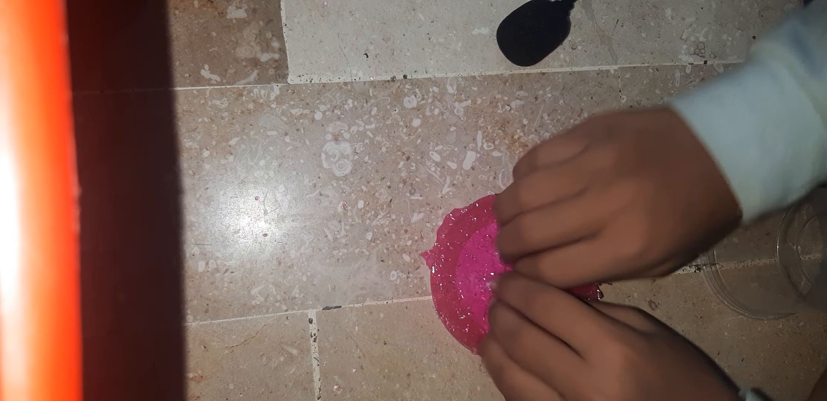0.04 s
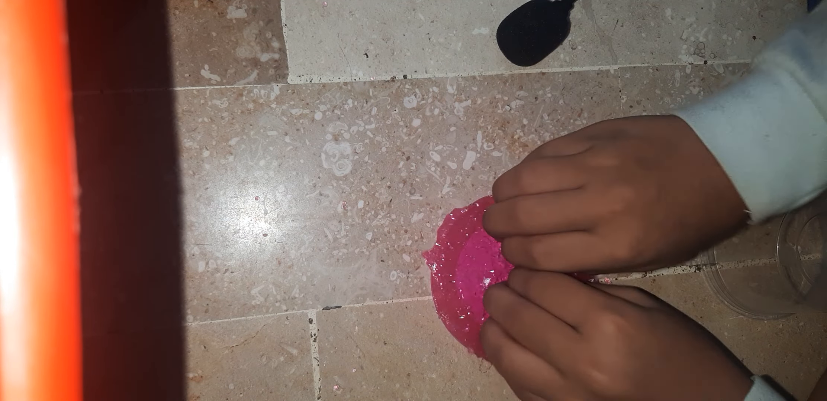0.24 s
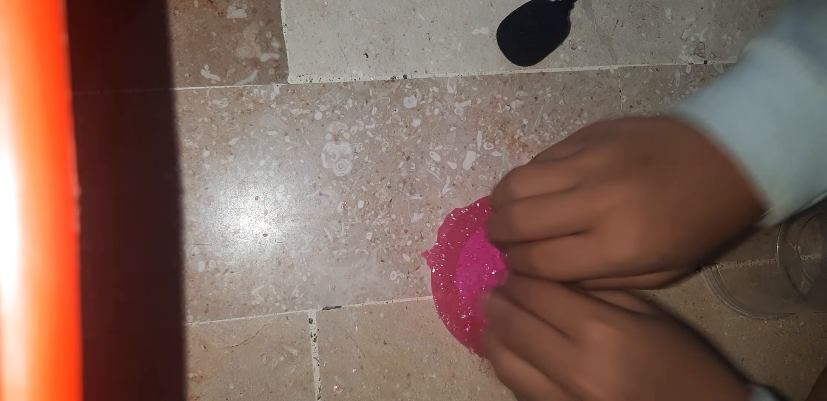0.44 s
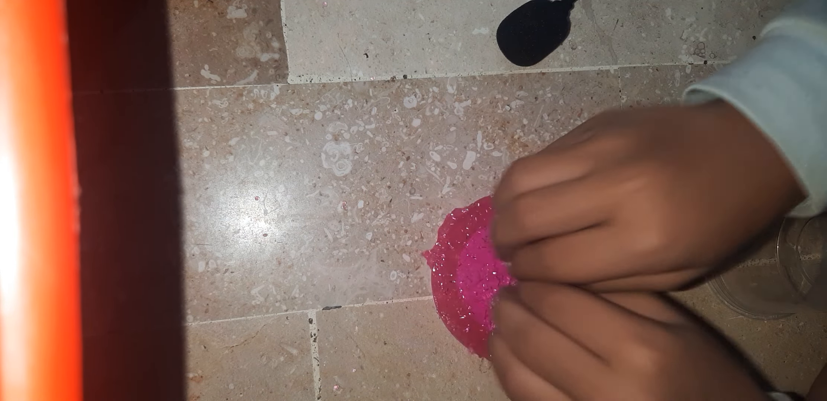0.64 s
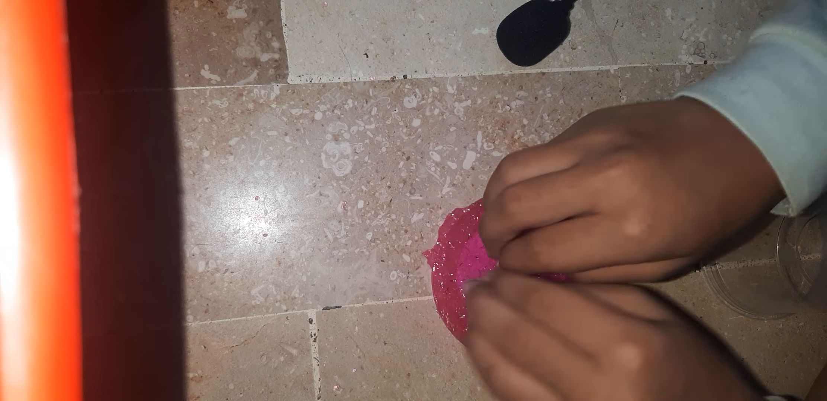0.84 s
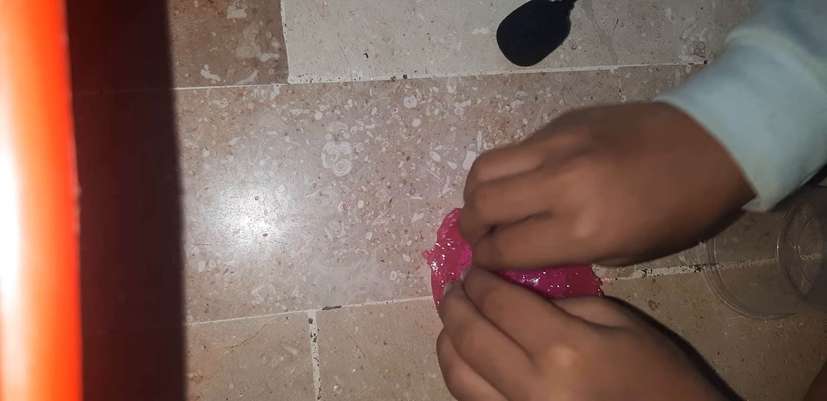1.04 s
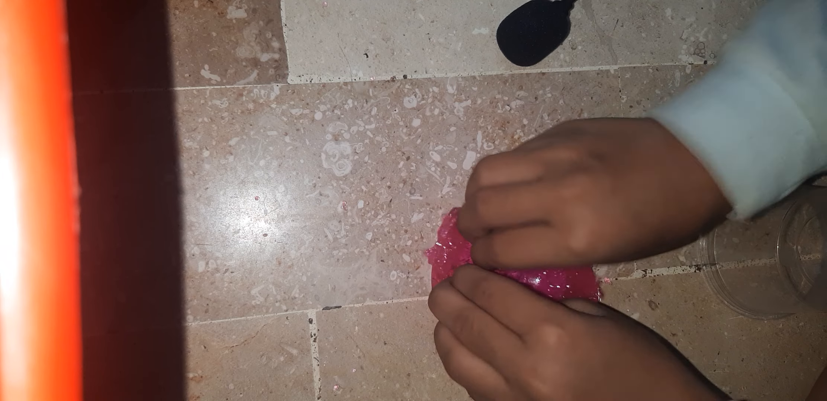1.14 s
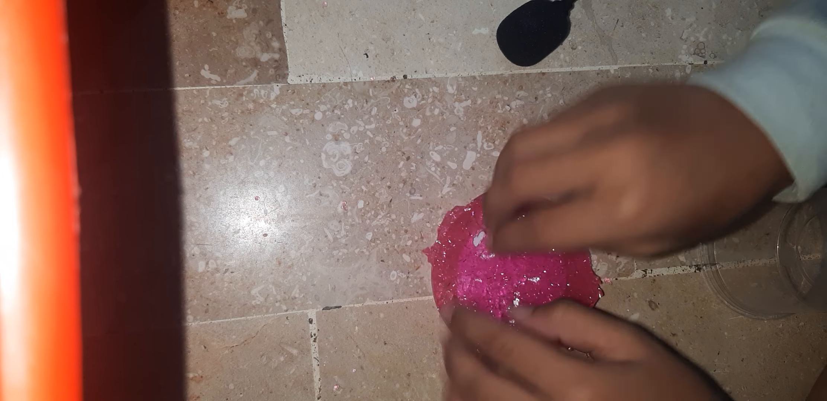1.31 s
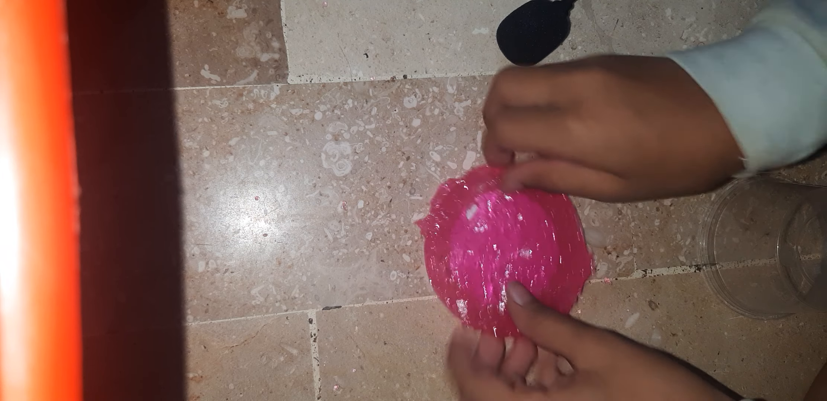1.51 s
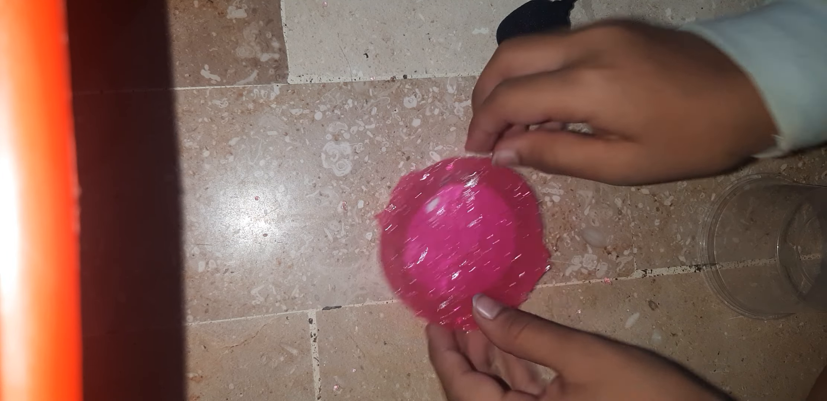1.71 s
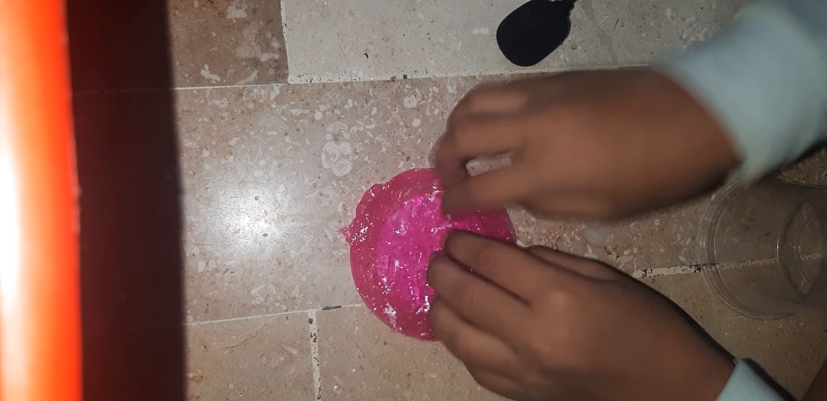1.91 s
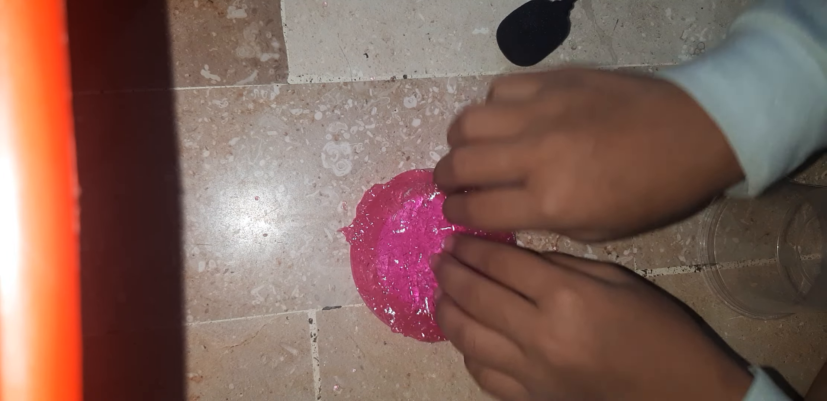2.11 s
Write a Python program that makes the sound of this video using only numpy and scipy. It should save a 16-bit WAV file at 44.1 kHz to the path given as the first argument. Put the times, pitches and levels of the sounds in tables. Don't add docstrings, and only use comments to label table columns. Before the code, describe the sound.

Slime handled very close to the microphone in a hard, tiled room: hollow pops and wet peeling crackles first, then sharp film snaps as it is pulled, with quieter clicks between, over soft room noise and hum.

```python
import sys
import numpy as np
from scipy import signal
from scipy.fft import rfft, irfft
from scipy.io import wavfile

SR = 44100
rng = np.random.default_rng(int(sys.argv[2]) if len(sys.argv) > 2 else 0)


def file_out(sig):
    cols = np.atleast_2d(sig).T
    lim = np.clip(cols, -1, 1)
    pcm = np.round(lim * 32767).astype(np.int16)
    wavfile.write(sys.argv[1], SR, pcm)


def gain_from_db(level_db):
    decades = np.asarray(level_db, float) / 20
    return 10 ** decades


N = 94815
LEAD_S = 0.1


def rms_one(x):
    return x / np.sqrt(np.mean(x ** 2) + 1e-20)


def at_hz(points, hz, axis=1):
    points = np.array(points)
    return np.interp(np.log(hz), np.log(points[:, 0]), points[:, axis])


def coloured(x, gain_db):
    hz = np.maximum(np.arange(len(x) // 2 + 1) * SR / len(x), 10)
    return irfft(rfft(x) * gain_from_db(gain_db(hz)), len(x))


def high_pass(order, hz):
    return signal.butter(order, hz, "high", fs=SR, output="sos")


BEFORE, AFTER = SR // 200, SR * 3 // 50


def add(track, s, shape):
    at = int((s + LEAD_S) * SR) + np.arange(-BEFORE, AFTER)
    track[at] += shape(at / SR - s - LEAD_S)


def ringing(t, hz, cycles, rise_s, glide=0):
    after = np.maximum(t, 0)
    swell = np.exp(np.minimum(t, 0) / rise_s)
    env = np.where(t < 0, swell, gain_from_db(-60 * after * hz / cycles))
    return env * np.cos(2 * np.pi * hz * t * (1 + glide * hz * after))


# pitch in Hz, level in dB.
FLOOR_COLOUR = [(15, -27), (25, -8), (287, -4), (441, -5), (677, -6), (839, -12), (1100, -12),
                (1730, -17.5), (15200, -31)]
# pitch in Hz, width in Hz, level in dB rms.
APPLIANCES = [(254.2, 3.8, -70), (748, 10, -68), (1108, 24, -77), (2500, 20, -83)]
# time in seconds, level in dB.
NOISE_SWELL = [(0, 12), (.4, 10), (.8, 6.5), (2.15, 1.5)]
# time in seconds, level in dB rms.
HUM_LEVEL = [(.1, -54), (.6, -59.5), (.86, -103), (1.2, -59), (1.4, -67), (1.52, -84), (1.65, -71),
             (2.1, -63)]


def background():
    t = np.arange(N) / SR
    noise = gain_from_db(-60) * rms_one(coloured(rng.standard_normal(N), lambda f: at_hz(FLOOR_COLOUR, f)))
    for hz, width_hz, db in APPLIANCES:
        tone = coloured(rng.standard_normal(N), lambda f: -20 * np.log10(1 + (2 * (f - hz) / width_hz) ** 2))
        noise += gain_from_db(db) * rms_one(tone)
    hum_hz = 57.5
    hum = np.sqrt(2) * gain_from_db(np.interp(t, *np.transpose(HUM_LEVEL))) * np.sin(2 * np.pi * hum_hz * t)
    return noise * gain_from_db(np.interp(t, *np.transpose(NOISE_SWELL))) + hum


def hole_ring(t, hz, upper_db, cycles, third_db):
    rise_s = 0.0006
    lowest = ringing(t, hz, cycles, rise_s, glide=0.011)
    upper = ringing(t, hz * 2.108, cycles * 1.4, rise_s / 2)
    third = ringing(t, hz * 4.1, cycles * 1.4, rise_s / 2)
    return lowest + gain_from_db(upper_db) * upper + gain_from_db(third_db) * third


def holes(size, rows, sign):
    direct, to_room = np.zeros(size), np.zeros(size)
    third_db, slump_lag_s = -15, 0.00764
    for s, db, hz, upper_db, cycles in rows:
        add(direct, s, lambda t: sign * gain_from_db(db) * hole_ring(t, hz, upper_db, cycles, third_db))
        add(direct, s + slump_lag_s, lambda t: gain_from_db(db - 31) * ringing(t, 136, 0.4, slump_lag_s / 5))
        add(to_room, s, lambda t: gain_from_db(db * 1.521) * hole_ring(t, hz, upper_db, cycles * 0.48, third_db - 6))
    return direct, to_room


# time in seconds, peak in dB, hole pitch in Hz,
# level of the upper pitch in dB, cycles of ring.
HOLE_POPS = [(-.05, -23, 620, 16, 4.2), (0.2275, -4.5, 586, -7, 10.5), (.3616, -39, 540, 6, 9),
             (.4850, -4.5, 640, -3, 7), (0.716, -11, 654, 6, 6.6), (0.9226, -31.5, 670, 11, 17),
             (.9270, -15.5, 683, 3, 6.3), (1.0608, -31.5, 703, 2.5, 6.3), (1.1303, -39.5, 690, 12.5, 12),
             (1.14, -28.5, 410, -11, 3.1), (1.1656, -42, 650, 12, 6.9), (1.17, -48, 750, 15.5, 8.1),
             (1.3653, -48.5, 665, 11.5, 9.1), (1.8144, -13, 760, 1, 2.65), (1.9228, -30.5, 700, -11, 14),
             (1.9225, -34, 233, -20, 6.7), (1.9440, -43, 313, 9.5, 1.2), (.373, -38, 604, 1, 10),
             (.083, -42.5, 700, 8.5, 11)]


def pops(size):
    return holes(size, HOLE_POPS, 1)


# pitch in Hz, seconds to fall by 60 dB, colour in dB.
ROOM_DECAY = [(126, 0.097, 18), (338, 0.36, 4.5), (700, 0.55, 3.5), (1540, 0.34, 5.5), (2120, 0.34, 2),
              (3400, 0.42, 4), (8000, 0.33, -10)]
# pitch in Hz, level in dB over the rest of the tail.
STANDING_WAVES = [(594, -28), (704, -16)]


def room(x):
    t = np.arange(SR * 3 // 5) / SR
    edges = 60 * 2 ** np.arange(0, 8.3, 0.5)
    white = rng.standard_normal((2, len(t)))
    tail = np.zeros(len(t))
    for k, (low, high) in enumerate(zip(edges, edges[1:])):
        hz = np.sqrt(low * high)
        band = signal.sosfilt(signal.butter(2, [low, high], "band", fs=SR, output="sos"), white[k % 2])
        tail += band * gain_from_db(at_hz(ROOM_DECAY, hz, axis=2) - 60 * t / at_hz(ROOM_DECAY, hz))
    for hz, db in STANDING_WAVES:
        tail += gain_from_db(db - 60 * t / at_hz(ROOM_DECAY, hz)) * np.sin(2 * np.pi * hz * t)
    gap_s = 0.00051
    tail *= np.clip(t / gap_s - 1, 0, 1)
    return gain_from_db(-42.5) * signal.fftconvolve(x, tail)[:len(x)]


def crackle(size):
    grains_per_s, spread_db, cycles = 7000, 4, 7.0
    bursts = rng.random(size) < grains_per_s / SR
    loudness = gain_from_db(spread_db * np.minimum(rng.exponential(1, size), 4))
    clicks = bursts * loudness * rng.choice([-1, 1], size)
    dealt, out = rng.integers(0, 14, size), np.zeros(size)
    for k, hz in enumerate(np.geomspace(1500, 15000, 14)):
        r = gain_from_db(-60 * hz / cycles / SR)
        resonance = [1, -2 * r * np.cos(2 * np.pi * hz / SR), r * r]
        out += signal.lfilter([1 - r * r, 0, r * r - 1], resonance, clicks * (dealt == k) + 1e-18)
    return rms_one(out)


def rub(size, rows):
    t, out = np.arange(size) / SR - LEAD_S, np.zeros(size)
    source = crackle(size) + 0.9 * rng.standard_normal(size)
    edge_s, crease_db, crease_hz = 0.0025, 2.0, 2400
    for s, length, db, hz, octaves in rows:
        turn = rng.uniform(0, 2 * np.pi, 2)

        def colour(f):
            band = -12 * (np.log2(f / hz) / octaves) ** 2
            fine = np.cos(2 * np.pi * f / crease_hz + turn[0])
            broad = np.cos(np.pi * f / crease_hz + turn[1])
            return band + crease_db * (fine + broad)

        part = (t > s - 0.01) & (t < s + length + 0.02)
        since = t[part] - s
        env = np.clip(np.minimum(since * 2, length + edge_s - since) / edge_s, 0, 1)
        env = env * gain_from_db(1.5 * since / length)
        out[part] += gain_from_db(db) * env * rms_one(coloured(source[part], colour))
    return out


# start in seconds, length in seconds, level in dB, centre pitch in Hz.
SKIN_PEELS = [(0.067, 0.031, -46, 5600), (0.22, 0.015, -32, 4200), (0.353, 0.02, -47, 6860),
              (0.4805, 0.013, -34, 4500), (0.495, 0.003, -35, 10000), (0.497, 0.021, -42.5, 4850),
              (0.531, 0.077, -53, 9700), (0.71, 0.007, -41, 9500), (0.7144, 0.0078, -32.5, 9200),
              (0.817, 0.0087, -49, 9300), (.918, 0.017, -39, 6500), (.937, .013, -53, 8000),
              (1.017, 0.043, -61, 6460), (1.129, 0.014, -41, 4300), (1.158, 0.013, -40.5, 5000),
              (1.225, 0.052, -61, 7450), (1.284, 0.014, -54.5, 8600), (1.492, 0.034, -58, 7600),
              (1.367, 0.0039, -51, 5500), (1.518, 0.041, -51.5, 6940), (1.565, 0.039, -50.5, 8000),
              (1.611, 0.014, -46.5, 6100), (1.627, 0.013, -59, 6500), (1.732, 0.0099, -48.5, 5630),
              (1.8146, .008, -36, 5000), (1.9384, 0.006, -46.5, 7200), (1.99, 0.0068, -61, 8000),
              (2.088, 0.026, -58, 8300), (2.139, 0.017, -59.5, 10100)]


def peels(size):
    octaves = 2.5
    return rub(size, [row + (octaves,) for row in SKIN_PEELS])


# start in seconds, length in seconds, level in dB,
# centre pitch in Hz, width in octaves.
FOLD_SQUEAKS = [
    (0.068, .014, -52.5, 4440, 0.17),
    (1.519, 0.019, -55, 4980, 0.12),
    (1.536, 0.011, -52, 9440, 0.13),
    (1.569, 0.021, -61, 7500, 0.11),
    (1.611, 0.012, -58, 3740, 0.082),
    (1.606, .014, -57, 7600, 0.13),
    (1.623, 0.015, -64, 3700, 0.078),
    (1.749, 0.057, -58, 4200, 0.73),
    (1.81, .06, -56, 3160, 0.89),
]


def squeaks(size):
    return rub(size, FOLD_SQUEAKS)


# time in seconds, peak in dB, pitch in Hz, cycles of ring.
POKE_SNAPS = [(0.0743, -33, 2300, 3), (.0745, -34, 7000, 6), (.0776, -32, 4500, 8), (.0845, -42, 9200, 4),
              (0.2276, -15, 5300, 6), (.2275, -15, 9000, 4), (.2335, -12, 12200, 5),
              (0.2413, -11, 6500, 0.53), (.2457, -28, 7000, 1.2), (.2913, -35, 7400, 7),
              (.2969, -25, 11100, 4.1), (0.329, -36, 6300, 6.2), (.3616, -26.5, 4100, 5.8),
              (0.3672, -21.5, 5200, 3.9), (.3706, -32, 4800, 5), (.3826, -36.5, 4480, 6.5),
              (.4772, -32, 9000, 1), (0.4799, -19, 6300, 7), (.4839, -13, 8000, 1), (0.4847, -5, 4400, 6),
              (.4849, -12, 7500, 2), (0.5528, -13, 11000, 4.7), (.5555, -27, 11300, 12),
              (.5739, -28, 6620, 29), (0.5886, -28, 4730, 2.7), (0.6054, -35.5, 8000, 4.1),
              (.71, -28, 10000, 1), (0.714, -22, 5500, 4), (.7162, -18, 11000, 3), (.7214, -28, 7000, 5),
              (.7161, -6.5, 3870, 1.2), (0.7197, -6.5, 12100, 7.7), (.7370, -28, 8700, 8),
              (.8186, -9.5, 8700, 0.83), (.8390, -32, 10300, 6), (0.9224, -11, 8500, 1.2),
              (0.9268, -5, 9500, 1), (.9276, -14, 5800, 5), (.9302, -17, 5500, 4)]
# time in seconds, peak in dB, pitch in Hz, cycles of ring.
PULL_SNAPS = [(0.931, -24, 6900, 8.9), (.9355, -22, 8500, 2), (0.9512, 3.5, 8000, 1.2),
              (1.0144, -31.5, 6760, 4.8), (1.0604, -7.5, 9900, 2.2), (1.0629, -22, 7000, 8.8),
              (1.061, -38.5, 4000, 18), (1.0637, -30, 10700, 6), (1.08, -29, 11500, 3.9),
              (1.0727, -26, 12800, 5), (1.0726, -29, 6330, 5), (1.127, -25, 6950, 5),
              (1.1274, -29, 2780, 2.8), (1.1298, -21, 3000, 5.9), (1.131, -30, 8500, 2),
              (1.135, -2.5, 6700, 0.41), (1.1668, -19, 6800, 1.8), (1.2359, -27, 8000, 1.5),
              (1.239, -25.5, 6800, 0.77), (1.2904, -30.5, 8600, 1.4), (1.3647, -31, 7300, 6.7),
              (1.3654, -31.5, 5720, 8.1), (1.3667, -40.5, 3040, 7), (1.455, -27, 8400, 0.53),
              (1.46, -26.5, 5250, 0.47), (1.4935, -36, 2500, 2), (1.495, -34, 8000, 1.2),
              (1.5975, -32, 6800, 3), (1.6627, -43, 5460, 6), (1.5866, -29.5, 7650, 4),
              (1.6769, -32, 5350, 3.8), (1.7301, -22, 4230, 4.5), (1.8139, 0, 7000, 0.58),
              (1.8142, -14, 6670, 6), (1.8143, -12, 11000, 4), (1.8144, -12, 3620, 13),
              (1.8148, -19, 3150, 10), (1.8195, -28, 6000, 2), (1.9233, -22, 2600, 1.8),
              (1.9222, -22.5, 6600, 0.55), (1.9439, -12, 7900, 0.47), (1.948, -22.5, 6750, 0.92),
              (1.952, -32, 11000, 4), (1.9558, -28, 6260, 1.8), (1.9875, -37, 11000, 2),
              (1.9935, -46, 5460, 4), (2.025, -35.5, 4000, 1.2)]


def snaps(size):
    out = np.zeros(size)
    rise_s, fizz_db, fizz_t60_s = 0.00006, -24, 0.02
    for rows, sign in [(POKE_SNAPS, 1), (PULL_SNAPS, -1)]:
        for s, db, hz, cycles in rows:
            noise = signal.sosfilt(high_pass(2, 3000), rng.standard_normal(BEFORE + AFTER))

            def snap(t):
                ring = signal.sosfilt(high_pass(2, hz * 0.33), ringing(t, hz, cycles * 2, rise_s))
                fizz = gain_from_db(fizz_db - 60 * np.maximum(t, 0) / fizz_t60_s) * (t > 0) * noise
                return gain_from_db(db) * (sign * ring + fizz)

            add(out, s, snap)
    return out


# time in seconds, peak in dB, hole pitch in Hz,
# level of the upper pitch in dB, cycles of ring.
HOLLOW_SUCKS = [
    (.2241, -27, 700, 3, 5),
    (1.1359, -18.5, 510, -22, 4),
    (1.1715, -30, 350, -6, 1.5),
    (1.3652, -38, 270, -20, 2.5),
    (1.4601, -34, 218, -17, 3),
    (1.9482, -26, 217, -20.5, 2.5),
    (2.0343, -42, 500, 0, 1.5),
]


def sucks(size):
    return holes(size, HOLLOW_SUCKS, -1)


def scene():
    lead = int(LEAD_S * SR)
    size = N + lead + SR // 10
    pop_direct, pop_to_room = pops(size)
    suck_direct, suck_to_room = sucks(size)
    bright = peels(size) + squeaks(size) + snaps(size)
    lift_s, lift_db = 1.0, -6
    sent = gain_from_db(lift_db * (np.arange(size) > lead + lift_s * SR))
    echoes = room(sent * (pop_to_room + suck_to_room + gain_from_db(-4) * bright))
    slime = pop_direct + suck_direct + bright + echoes
    return (slime[lead:lead + N] + background())[None]


def low_pass(x):
    return signal.sosfilt(signal.butter(12, 16820, fs=SR, output="sos"), x)


def record(dry):
    x = signal.sosfilt(high_pass(4, 42), dry)
    x = signal.sosfilt(signal.cheby2(8, 40, 16800, fs=SR, output="sos"), x)
    mix = np.clip(x, -1, 1)
    return low_pass(mix)


dry = scene()
out = record(dry)
file_out(out)
```